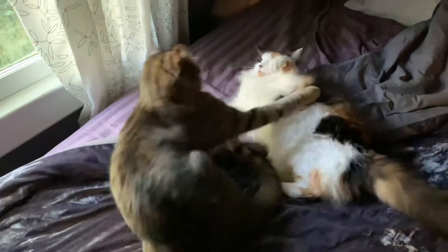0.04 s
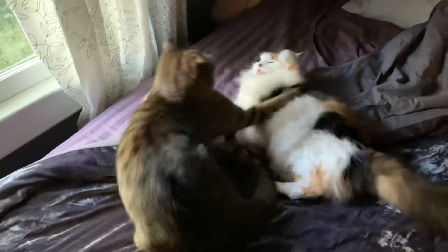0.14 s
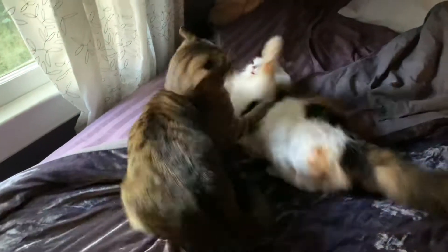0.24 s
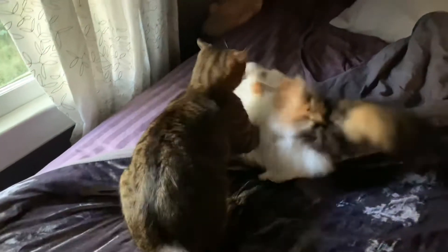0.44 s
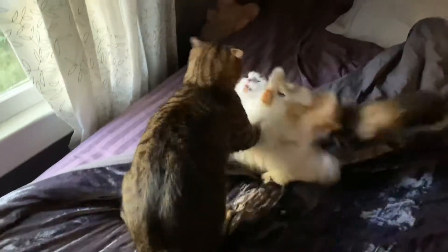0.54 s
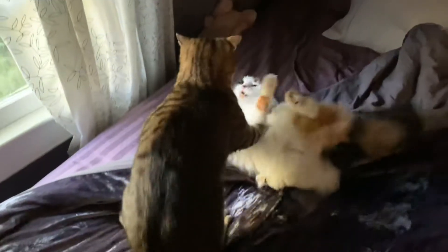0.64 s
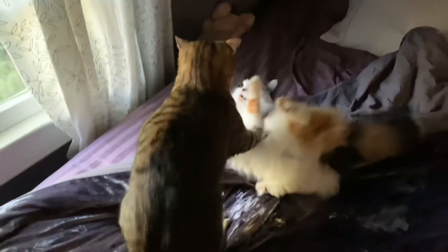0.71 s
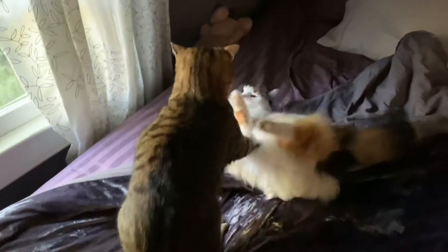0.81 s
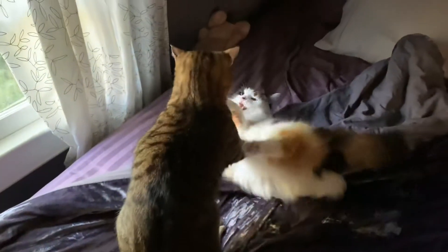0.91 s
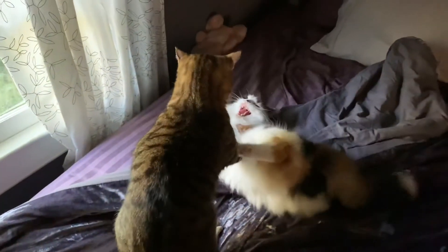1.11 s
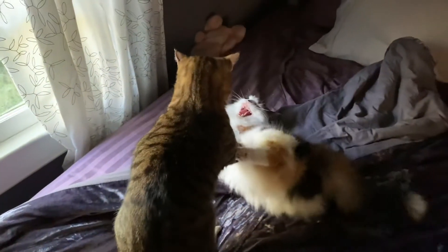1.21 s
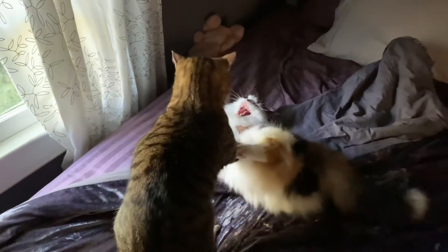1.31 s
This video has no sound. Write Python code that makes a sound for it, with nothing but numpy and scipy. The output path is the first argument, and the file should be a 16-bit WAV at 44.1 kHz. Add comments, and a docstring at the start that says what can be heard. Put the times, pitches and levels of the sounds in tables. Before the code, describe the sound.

Soft thumps and rustling on a bed, then a cat's quiet, breathy hiss.

```python
"""Two cats tussle on a bed in a small, quiet bedroom with a low hum.
The duvet stirs, then paws and a rolling body thump into the mattress, ringing the bed and slapping
the cover; one paw skids with a bright swish. The rustle settles. The cat underneath opens its mouth
with a tiny wet smack and lets out a soft, breathy hiss in two pushes, as air sounds its throat
and sizzles past its teeth."""
import sys
import numpy as np
from scipy import signal
from scipy.fft import rfft, irfft
from scipy.io import wavfile
from scipy.ndimage import uniform_filter1d, map_coordinates

SR = 44100
rng = np.random.default_rng(int(sys.argv[2]) if len(sys.argv) > 2 else 0)


def bounce(signal):
    """Save signal as a 16-bit WAV file at the path given by the first command-line argument."""
    frames = np.transpose(np.atleast_2d(signal))
    limited = np.clip(frames, -1, 1)
    pcm = np.round(limited * 32767).astype(np.int16)
    wavfile.write(sys.argv[1], SR, pcm)


N = 59535
TIME, HZ = np.arange(N) / SR, np.arange(N // 2 + 1) * SR / N


def blows():
    """Each blow pushes the mattress in, rings the bed and slaps the cover, which rings faintly after."""
    # Each row: start in seconds, thump gain in dB, pitch of the give in Hz, slap in dB, ring time factor.
    hits = [(0.2044, -40, 573, -50.5, 0.95), (0.2234, -28, 207.5, -41, 2.26),
            (0.278, -41.5, 403, -35.5, 0.53), (0.2837, -27.5, 310, -39.5, 0.62),
            (0.331, -32, 253.4, -62, 0.33), (0.3467, -33, 184, -73, 0.76), (0.4, -43, 275, -66, 0.36),
            (0.443, -56, 319, -69, 0.54), (0.651, -78, 196, -71.5, 1.4)]
    # Each row: pitch in Hz, relative level in dB, seconds to fall 60 dB at a ring time factor of 1.
    bed_modes = [(113, -1.5, 0.14), (184.7, 2, 0.11), (306.5, 3, 0.092), (413.2, -13.5, 0.24),
                 (489.3, -5, 0.14), (585, -7.5, 0.15), (675, -12, 0.065), (776, -12.5, 0.044)]
    # The tone of slapped cloth. Each row: frequency in Hz, relative level in dB.
    slap_colour = [(200, -20), (600, -20), (1000, -11.5), (1450, 9.5), (2200, -13.5), (3200, -3),
                   (3900, -5), (4600, -2.5), (6200, -21), (9500, -11), (12500, -13), (15000, -47)]
    # The ring after a slap. Each row: pitch in Hz, width in Hz, relative level in dB.
    slap_rings = [(1447, 96, 5), (3234, 120, 8), (4540, 300, 0.5)]
    give_db, give_s, slap_attack_s = -4.5, 0.0035, 0.00092
    thump, slap, afterring = np.zeros((3, N))
    for start, thump_db, give_hz, slap_db, ring_factor in hits:
        age = np.maximum(TIME - start, 0)
        body = 0
        for k, (hz, db, t60) in enumerate(bed_modes):
            mode_db = db + 1.5 * rng.standard_normal() - 60 * age / (t60 * ring_factor)
            body += (-1) ** k * from_db(mode_db) * np.sin(2 * np.pi * hz * age)
        press = age / give_s * np.exp(1 - age / give_s)
        give = -from_db(give_db) * press * np.sin(2 * np.pi * give_hz * age)
        thump += from_db(thump_db) * (give + 0.33 * body)
        slap += from_db(slap_db) * burst(start, slap_attack_s, decay_s=0.0055)
        afterring += from_db(slap_db - 14.5) * burst(start, slap_attack_s, decay_s=0.027)
    return thump + stereo(slap * coloured(white(), slap_colour) + afterring * ringing(slap_rings))


def hiss():
    """A thin spit of air through the barely open mouth, a low huff, then breath jetting past the teeth."""
    # Each row: time in seconds, throat level in dB, relative jet level in dB, jaw opening from 0 to 1.
    breath = [(0.92, -91, -103, 0), (0.938, -99, -100, 0), (0.945, -69, -82, 0.17),
              (0.97, -67.5, -75, 0.15), (1.0, -57.5, -66, 0.21), (1.03, -60.5, -66.5, 0.63),
              (1.082, -63.5, -73, 0.28), (1.125, -61.5, -68.5, 0.59), (1.185, -57.5, -62.5, 0.56),
              (1.28, -58.5, -62.5, 0.99), (1.35, -62, -62, 0.63)]
    # The huff of the first push. Each row: pitch in Hz, width in Hz, relative level in dB.
    huff_rings = [(114, 63, -2), (284, 120, -3.5)]
    # The sizzle at the teeth. Each row: frequency in Hz, relative level in dB.
    jet_colour = [(1200, -19), (2300, -4), (3300, -1.5), (5000, -3), (5900, -6), (7200, 8), (8500, -5),
                  (9500, -2.5), (11000, -5.5), (12500, 5.5), (14000, 2), (15500, -4)]
    # The first thin rush. Each row: frequency in Hz, relative level in dB.
    spit_colour = [(3000, -48), (6000, -21), (7400, -1), (9000, -39), (12500, -7), (14500, -2)]
    throat_db, jet_db, jaw = in_time(breath)
    hollow = throat(throat_db, jaw)
    huff_noise = evened(ringing(huff_rings), span_s=0.038)
    huff = from_db(-61.5) * burst(0.95, attack_s=0.045, decay_s=0.033) * huff_noise
    jet = from_db(jet_db + 3.5) * coloured(white(), jet_colour)
    spit = from_db(-57) * burst(0.939, attack_s=0.037, decay_s=0.022) * coloured(white(), spit_colour)
    return (hollow + stereo(huff) + reflect(stereo(jet + spit))) * (TIME > breath[0][0])


def throat(level_db, jaw):
    """Unvoiced air sounds the throat's resonances, higher and brighter as the jaw opens."""
    # Each row: pitch in Hz, width in Hz and relative level in dB with the jaw half open,
    # then the change in dB from shut to wide open.
    resonances = [(174.6, 12, -15, 10), (299.9, 72, -11.5, -13.5), (388.6, 30.5, -9, -3),
                  (606.3, 530, -11, 0), (861, 21, -9, -1), (957.4, 29, -10, -7), (1040, 72, -10.5, 2),
                  (1188, 64, -11.5, 7), (1449, 43, -12, 9), (1606, 65, -15.5, 11), (1855, 370, -14, 6.5)]
    jaw_rise_hz, lean_left_db = 28.03, 1.5
    wander_octaves, waver_db = 0.028, 2  # each resonance drifts and swells on its own
    opening = jaw - 0.5
    tones, power = 0, 0
    for hz, width, db, jaw_db in resonances:
        octaves = np.log2(1 + jaw_rise_hz * opening / hz) + wander_octaves * waver()
        band = evened(resonate(white(), hz, width), span_s=0.049)
        gain = from_db(db + jaw_db * opening + waver_db * waver())
        tones += gain * np.array([glide(channel, octaves) for channel in band])
        power += gain ** 2
    pan = from_db(lean_left_db * np.array([[0.5], [-0.5]]))
    return pan * stereo(from_db(level_db) * tones / np.sqrt(power))


def smack():
    """The mouth parts with a small wet tick; the tongue peels away just after, brief and brighter."""
    # The mouth's resonances. Each row: pitch in Hz, width in Hz, relative level in dB.
    mouth_rings = [(1010, 190, -7.5), (1490, 330, -1)]
    # The tongue's peel. Each row: pitch in Hz, width in Hz, relative level in dB.
    peel_rings = [(3250, 570, 0)]
    start_s = 0.853
    tick = from_db(-63) * burst(start_s, attack_s=0.00066, decay_s=0.014) * ringing(mouth_rings)
    peel = from_db(-75) * burst(start_s + 0.0087, attack_s=0.008, decay_s=0.017) * ringing(peel_rings)
    return stereo(tick + peel)


def paw_skid():
    """A bright swish while a paw slides over the smooth cover, dying as it stops."""
    # Each row: frequency in Hz, relative level in dB.
    swish_colour = [(3000, 5), (5000, 12.5), (7000, 2), (10000, 11.5), (12500, 7), (15000, -15)]
    start_s, attack_s, hold_s, decay_s = 0.216, 0.0012, 0.087, 0.011
    age = np.maximum(TIME - start_s, 0)
    slide = np.minimum(age / attack_s, 1) * np.exp(-np.maximum(age - hold_s, 0) / decay_s)
    return reflect(stereo(from_db(-54.5) * slide * coloured(white(), swish_colour)))


def bedding():
    """The dragged duvet gives a muffled rush; its creases crackle finely on top."""
    # The cats' movement. Each row: time in seconds, relative duvet and rustle levels in dB.
    motion = [(0.0, -63.5, -66), (0.106, -69.5, -72), (0.182, -62.5, -66.5), (0.198, -43, -66.5),
              (0.222, -35.5, -53), (0.262, -40.5, -54), (0.282, -31.5, -48.5), (0.294, -31.5, -54.5),
              (0.32, -47, -54.5), (0.354, -42.5, -58.5), (0.38, -52.5, -67.5), (0.488, -68, -74),
              (0.542, -85, -80.5), (0.588, -66.5, -73.5), (0.722, -87, -78), (0.83, -80.5, -82.5)]
    # The muffled rush. Each row: frequency in Hz, relative level in dB.
    duvet_colour = [(40, -16), (75, -9.5), (125, 10), (190, -3.5), (320, 2), (450, -4), (600, -9),
                    (850, -9.5), (1300, -29), (3000, -38.5)]
    # The crackling cloth. Each row: frequency in Hz, relative level in dB.
    rustle_colour = [(300, 1), (800, -1.5), (1500, 0.5), (2500, 1), (3200, -2), (3900, -1.5), (4500, -7),
                     (6300, -8), (11000, -17.5), (15000, -29)]
    creases_per_s, spread_db, crease_share = 2500, 2.5, 0.61
    duvet_db, rustle_db = in_time(motion)
    clicks = (rng.random((2, N)) < creases_per_s / SR) * rng.choice([-1, 1], (2, N))
    creases = clicks * from_db(spread_db * np.minimum(rng.exponential(1, (2, N)), 5))
    rustle = coloured(crease_share * rms_one(creases) + (1 - crease_share) * white(), rustle_colour)
    duvet = evened(coloured(white(), duvet_colour), span_s=0.0193)
    return stereo(from_db(duvet_db - 3) * duvet + from_db(rustle_db + 2.5) * reflect(rustle))


def mattress():
    """Deep swells as the rolling body shifts its weight on the springs."""
    # Each row: start in seconds, length in seconds, level in dB.
    heaves = [(0.079, 0.063, -54.5), (0.162, 0.084, -50.5), (0.279, 0.11, -41), (0.394, 0.12, -57)]
    # The rumble of the springs. Each row: frequency in Hz, relative level in dB.
    heave_colour = [(15, -37), (33, -9.5), (57, -5), (85, -4.5), (140, -18.5), (400, -80)]
    swell = 0
    for start, length, db in heaves:
        progress = np.clip((TIME - start) / length, 0, 1)
        swell += from_db(db) * np.sqrt(np.abs(np.sin(np.pi * progress)))
    return swell * evened(coloured(rng.standard_normal(N), heave_colour), span_s=0.033)


def reflect(x, count=12, first_s=0.001, last_s=0.013, echo_db=-4.5):
    """Early echoes off the window, wall and headboard ripple the spectrum."""
    lags = (rng.uniform(first_s, last_s, count) * SR).astype(int)
    echoes = sum((-1) ** k * np.pad(x, ((0, 0), (lag, 0)))[:, :N] for k, lag in enumerate(lags))
    return (x + from_db(echo_db) * echoes / np.sqrt(count)) / np.sqrt(1 + from_db(echo_db) ** 2)


def bedroom(x, t60_s=0.44, wet_db=-14.5, predelay_s=0.011):
    """The small room adds a short diffuse tail."""
    tail = stereo(white()) * from_db(-60 * TIME / t60_s) * (TIME > predelay_s)
    return x + from_db(wet_db) * signal.fftconvolve(x, rms_one(tail) / np.sqrt(N), axes=1)[:, :N]


def room_tone(hum_hz=56.9, air_db=-71):
    """A low wavering hum over faint air noise."""
    # Each row: time in seconds, level in dB.
    hum_levels = [(0, -58.5), (.45, -67.5), (.63, -60.5), (.73, -80), (.8, -67.5), (.95, -68),
                  (1.07, -64.5), (1.2, -72), (1.35, -63)]
    # Each row: frequency in Hz, relative level in dB.
    air_colour = [(20, -2.5), (60, 5), (120, -2.5), (300, -14.5), (1200, -21.5), (6000, -30.5),
                  (15000, -26)]
    hum_db, = in_time(hum_levels)
    hum = np.sqrt(2) * from_db(hum_db) * np.sin(2 * np.pi * (hum_hz * TIME + rng.random()))
    return hum + from_db(air_db) * stereo(coloured(white(), air_colour))


def stereo(pair):
    """Left and right from a mid and a side signal; the bass stays centred."""
    # Each row: frequency in Hz, level of the side against the mid in dB.
    image_width = [(120, -65), (280, -87), (500, -10), (900, -5.5), (2400, 1), (5500, -2.5), (7000, -4),
                   (9000, -22)]
    width = gains(image_width)
    mid, side = irfft(rfft(pair) * [np.ones_like(width), width] / np.sqrt(1 + width ** 2), N)
    return np.array([mid + side, mid - side])


def from_db(db):
    """Decibels to gain."""
    return 10 ** (np.asarray(db) / 20)


def rms_one(x):
    """Scale to unit power."""
    return x / np.sqrt(np.mean(x ** 2) + 1e-20)


def in_time(rows):
    """Draw a curve through each column of timed breakpoints."""
    times, *columns = np.transpose(rows)
    return [np.interp(TIME, times, column) for column in columns]


def gains(points):
    """An EQ curve through points of frequency in Hz and level in dB."""
    hz, db = np.transpose(points)
    return from_db(np.interp(np.log(HZ + 1), np.log(hz), db))


def white():
    """Two unrelated noises, for mid and side."""
    return rng.standard_normal((2, N))


def coloured(x, spectrum):
    """Shape a steady sound with an EQ curve; unit power."""
    return rms_one(irfft(rfft(x) * gains(spectrum), N))


def resonate(x, hz, width_hz):
    """A steep-sided resonance; unit power."""
    radius = np.exp(-np.pi * width_hz * np.sqrt(2) / SR)
    section = [1 - radius, 0, radius - 1, 1, -2 * radius * np.cos(2 * np.pi * hz / SR), radius ** 2]
    return rms_one(signal.sosfilt([section, section], x))


def ringing(resonances):
    """Noise in a few resonances; unit power."""
    return rms_one(sum(from_db(db) * resonate(white(), hz, width) for hz, width, db in resonances))


def evened(x, span_s):
    """Even out the slow swings of a noise, so that its envelope sets its level."""
    return x / np.sqrt(uniform_filter1d(x ** 2, size=max(int(span_s * SR), 1), axis=-1) + 1e-9)


def burst(start_s, attack_s, decay_s):
    """A linear rise and an exponential fall."""
    age = np.maximum(TIME - start_s, 0)
    return np.minimum(age / attack_s, 1) * np.exp(-np.maximum(age - attack_s, 0) / decay_s)


def waver(rolloff_hz=6.41):
    """A slow random drift; unit power."""
    return rms_one(irfft(rfft(rng.standard_normal(N)) * np.exp(-(HZ / rolloff_hz) ** 2), N))


def glide(x, octaves):
    """Bend a sound's pitch along a curve."""
    return map_coordinates(x, [np.cumsum(2 ** octaves) % (N - 1)], order=1)


def scene():
    """The tussle, then the smack and the hiss, over the bedroom's hum."""
    return bedroom(blows() + smack()) + paw_skid() + bedding() + mattress() + hiss() + room_tone()


def record(dry):
    """The microphone pair shifts the treble's phase between its sides; the top is cut steeply."""
    # Each row: frequency in Hz, phase by which the left leads in turns.
    mic_phase = [(4500, 0), (6000, .47), (7700, .57), (8500, 1), (9650, 1), (11000, 1.5), (11900, 1.5),
                 (13250, 2), (14700, 2), (15800, 2.45)]
    cutoff_hz = 15800
    turns = np.interp(HZ, *np.transpose(mic_phase))
    heard = irfft(rfft(dry) * np.exp(1j * np.pi * turns * np.array([[1], [-1]])), N)
    return signal.sosfilt(signal.ellip(10, 0.2, 70, cutoff_hz, fs=SR, output="sos"), heard)


dry = scene()
out = record(dry)
bounce(out)
```